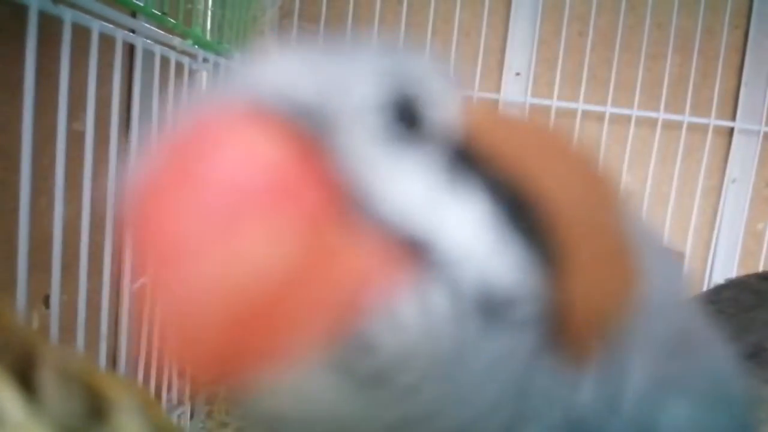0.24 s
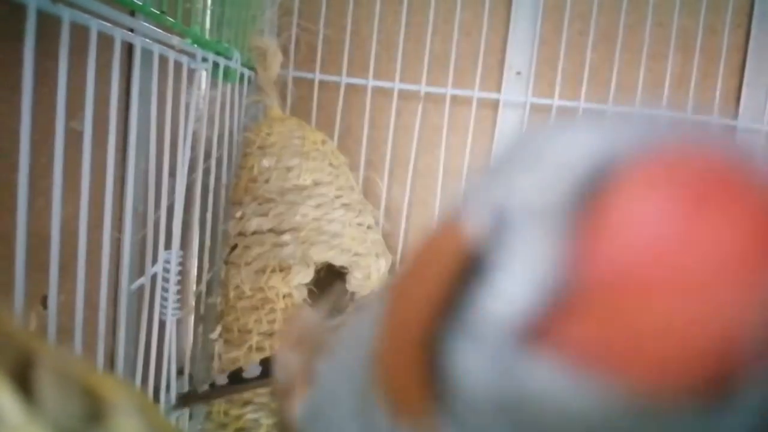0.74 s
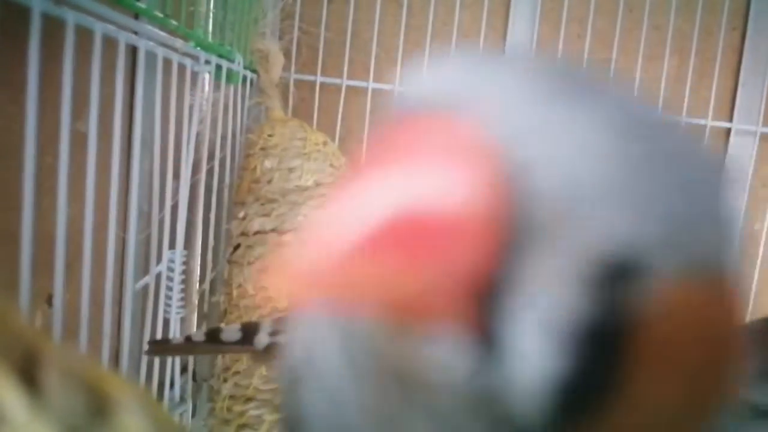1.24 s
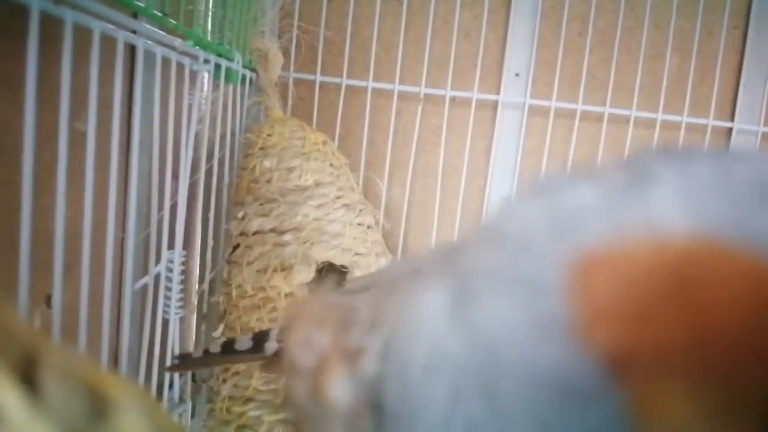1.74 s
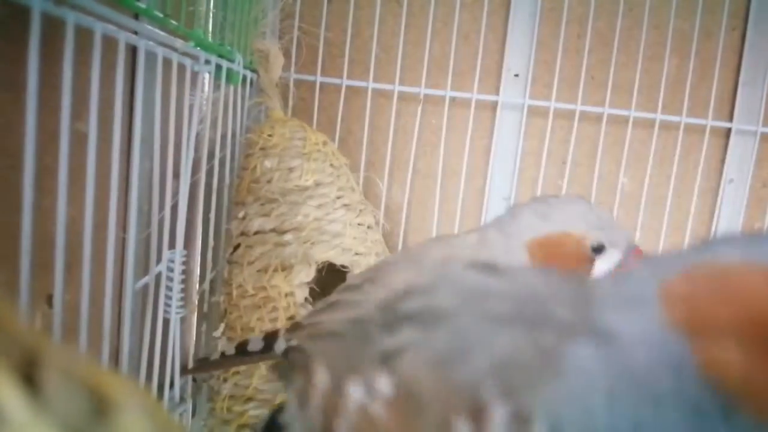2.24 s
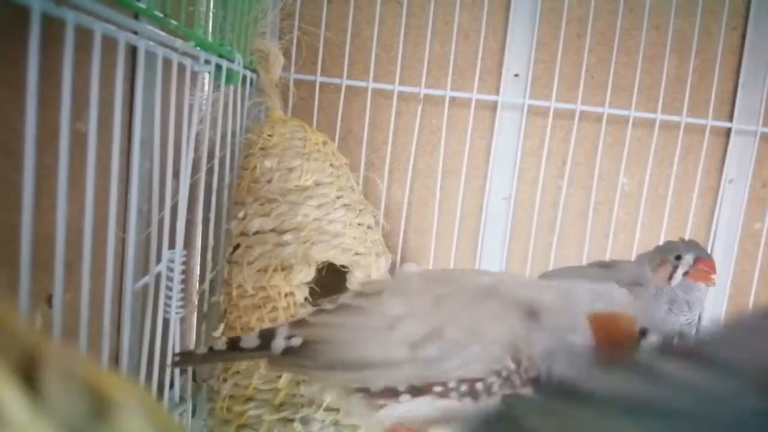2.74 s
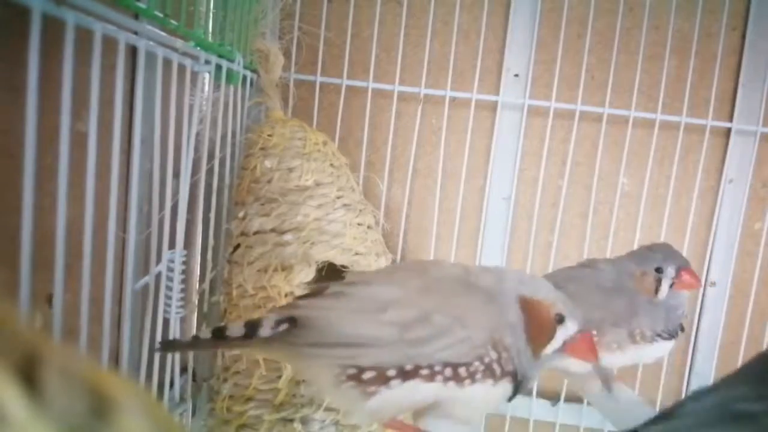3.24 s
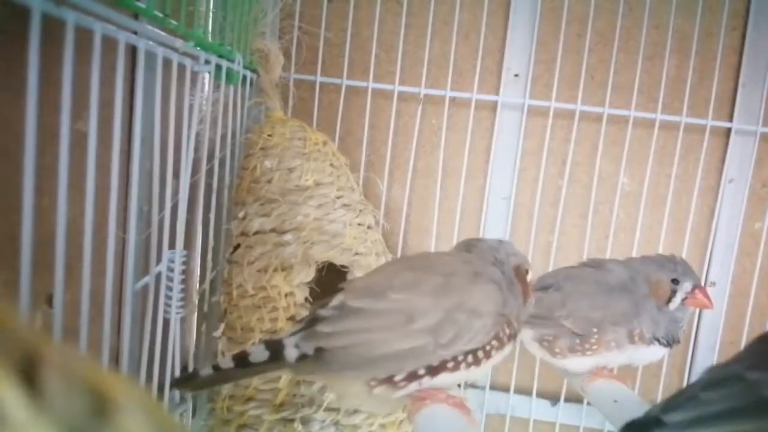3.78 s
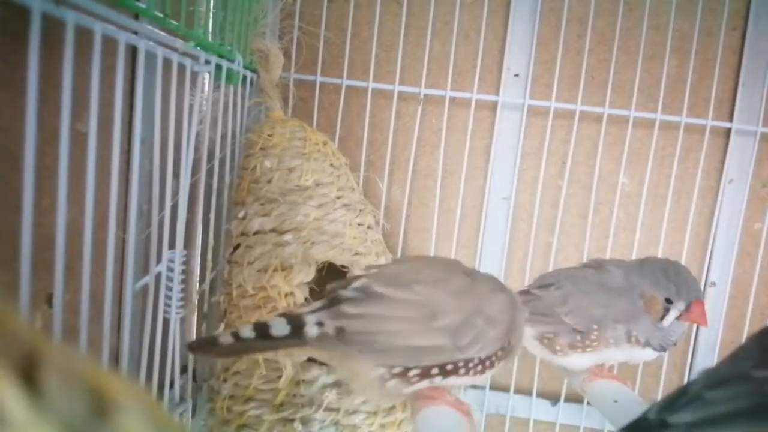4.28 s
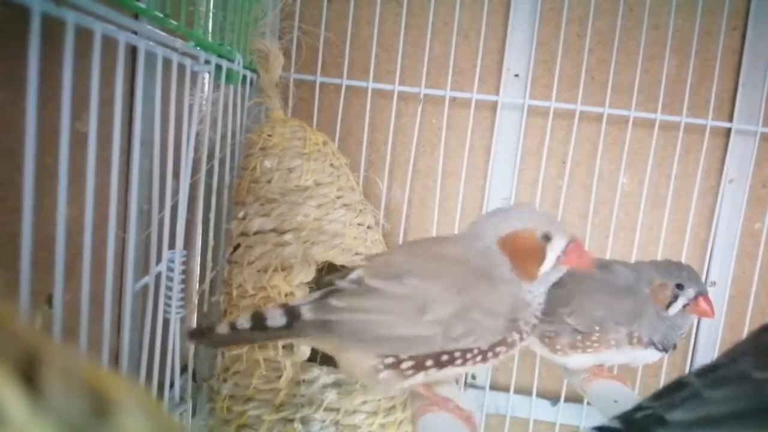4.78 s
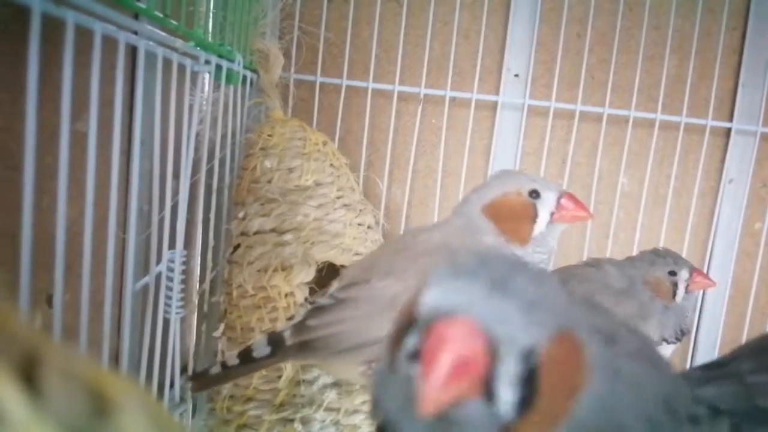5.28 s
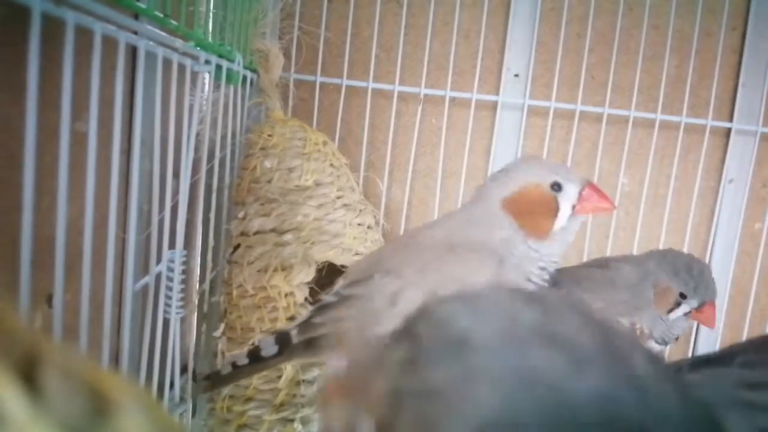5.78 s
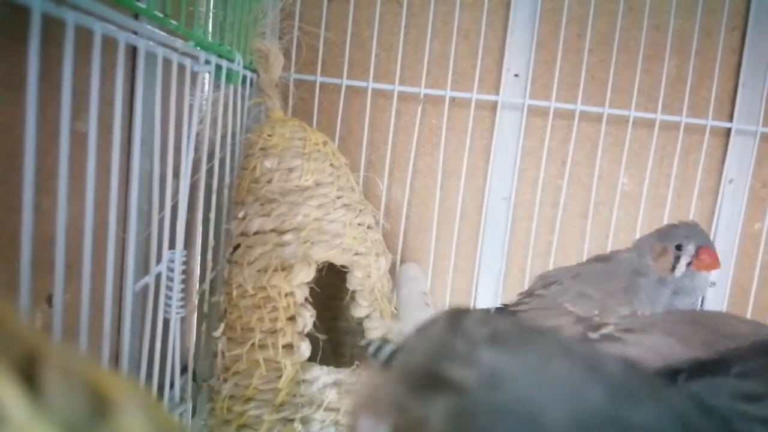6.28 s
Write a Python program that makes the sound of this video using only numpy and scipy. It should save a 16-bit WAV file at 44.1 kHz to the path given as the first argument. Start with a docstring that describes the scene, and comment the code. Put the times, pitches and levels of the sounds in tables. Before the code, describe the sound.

Several zebra finches chatter close by in a wire cage, with sharp chirps, raspy scolding, dry ticks and soft nasal calls over feather rustle.

```python
"""A high arched chirp over a soft rustle, then zebra finches chattering close by in a wire cage.
Whistles are quivering near sines; warbles add grit; rasps and dry tets are snaps ringing the throat;
nasal calls are harmonic stacks. Shaped noise rustles and taps, a foot scrapes, a perch thuds.
Dense echoes give the cage, a short noise tail the small room; faint far notes and a hush lie behind."""
import sys
import numpy as np
from scipy import signal
from scipy.fft import rfft, irfft
from scipy.io import wavfile
from scipy.ndimage import uniform_filter1d

SR = 44100
rng = np.random.default_rng(int(sys.argv[2]) if len(sys.argv) > 2 else 0)


def put_to_file(sound):
    """Save the sound as 16-bit audio at rate SR, in the file named by the first command-line argument."""
    columns = np.atleast_2d(sound).T  # one column per channel
    safe = np.clip(columns, -1, 1)
    whole_steps = np.round(safe * 32767)
    wavfile.write(sys.argv[1], SR, whole_steps.astype(np.int16))


N = 287532
TIME = np.arange(N) / SR   # s

# twitter motif, opening dip, high flick, low note:
# place in lead-up [0-1], length/s, start f/Hz, end f/Hz, grit re tone/dB, swell over note/dB
TWITTER_MOTIF = [(0, 0.02474, 3660, 2885, -25.5, 5.5), (.36, 0.023, 4596, 3676, -42, 11),
                 (.74, .021, 2750, 2950, -14, 8)]
# twitters: t/s, lead-up/s, slide top f/Hz, levels of dip, flick, low note, slide/dB
TWITTER_PHRASES = [(1.289, 0.0715, 3380, -31, -30, -25, -23.5), (3.023, 0.075, 3770, -25, -29, -24, -27.5),
                   (3.574, 0.073, 3714, -18.5, -26.5, -26, -24), (3.746, 0.071, 3798, -23, -26, -23, -23),
                   (5.286, 0.0709, 3747, -18, -24.5, -23.5, -24),
                   (5.463, .076, 3520, -20.5, -28, -23.5, -24.5), (5.728, 0.0687, 3534, -22, -32, -29, -27)]
# chirp motif, opening dip, held high note: columns as the twitter motif
CHIRP_MOTIF = [(0, 0.0262, 3690, 3060, -22.5, -2.5), (.34, 0.0262, 4296, 4208, -22, 11)]
# chirps: t/s, lead-up/s, slide top f/Hz, levels of dip, held note, slide/dB
CHIRP_PHRASES = [(0.733, 0.052, 4800, -26.5, -25, -32), (1.477, 0.049, 5250, -15, -15.5, -22),
                 (2.783, 0.06, 4720, -13.5, -16, -23.5), (4.021, 0.06, 3511, -20, -17.5, -23.5),
                 (4.185, 0.047, 4857, -18.5, -23.5, -27.5)]
# closing slide of each phrase
SLIDE_S, SLIDE_END_HZ, SLIDE_FADE_DB = 0.053, 2156, 7.5
# lone whistles, slurs and peeps: t/s, length/s, start f/Hz, end f/Hz, level/dB
LONE_SLURS = [(0.8, 0.037, 5046, 5022, -31), (0.841, 0.0142, 3840, 4013, -24.5),
              (1.094, 0.038, 3500, 3100, -31.5), (1.574, 0.021, 3710, 4150, -18.5),
              (1.879, 0.026, 3320, 2620, -38), (2.013, .032, 3308, 2760, -31),
              (2.467, 0.063, 4645, 4830, -37.5), (2.52, 0.0515, 3800, 2670, -30),
              (2.635, 0.0653, 3200, 2289, -30), (2.815, 0.025, 5213, 5340, -19),
              (2.899, 0.0125, 3950, 3738, -16), (2.914, 0.056, 6640, 4627, -23.5),
              (2.942, .037, 3074, 3059, -24.5), (3.1, 0.018, 3460, 3190, -27.5),
              (3.219, 0.0187, 5320, 2850, -26), (3.225, 0.02, 7220, 5816, -28.5),
              (3.275, .065, 4908, 2897, -27.5), (3.35, 0.053, 2985, 2140, -35.5),
              (4.482, 0.042, 4440, 4525, -27.5), (4.871, 0.055, 3050, 2520, -34.5),
              (5.616, 0.029, 4423, 3330, -29), (6.334, 0.011, 3330, 2710, -21.5),
              (6.362, 0.011, 2940, 3380, -22.5), (6.384, 0.012, 3165, 2970, -12.5),
              (6.504, 0.018, 4200, 2915, -20)]
# chirps that flick up and drop: t/s, length/s, top f/Hz, level/dB
ARCHED_CHIRPS = [(0.006, 0.052, 3837, -25.5), (2.972, 0.054, 3700, -26.5), (3.152, .042, 3911, -25.5),
                 (6.398, 0.043, 4160, -20.5)]
# pitch contour of an arched chirp: place in note [0-1], share of top f [ratio]
ARCH_CONTOUR = [(0, .85), (.22, 1), (.55, .8), (1, 0.5)]
# throat resonance that a whistle sweeps through: centre, half width, peak
THROAT_HZ, THROAT_WIDTH_HZ, THROAT_DB = 3226, 310, 10.5
# whistle quiver: RMS share of pitch, bandwidth
QUIVER, QUIVER_HZ = 0.015, 90
# second strand: pitch ratio, sine amplitude
STRAND_RATIO, STRAND_DB = 1.35, -19
# warble bouts: t/s, length/s, nominal centre f/Hz, level before the per-note offset/dB, grit re tone/dB
WARBLE_BOUTS = [(0.389, 0.19, 2864, -33.5, -5), (1.136, 0.21, 3270, -32, -10),
                (1.773, 0.17, 2980, -30, -5.5), (1.975, 0.15, 2912, -27, -8),
                (2.538, 0.13, 3050, -23.5, -3.5), (2.699, 0.095, 2875, -28.5, 5),
                (3.239, 0.042, 3350, -23.5, -8), (3.327, 0.056, 2910, -42, 1), (3.925, 0.1, 2970, -32, -7),
                (4.758, 0.11, 2950, -38.5, -4), (5.562, 0.13, 3229, -25, -2.5),
                (6.354, .095, 2950, -30.5, 4), (3.079, .058, 3050, -26.5, -17)]
# scolding rasps: t/s, length/s, squeal and throat start f/Hz, end f/Hz, level/dB
RASP_CALLS = [(0.142, 0.27, 5230, 5638, -45), (0.666, 0.054, 5020, 5770, -24.5),
              (0.709, 0.12, 6070, 5880, -33), (1.016, 0.081, 3367, 3100, -33),
              (2.812, 0.0713, 4600, 6280, -20.5), (4.257, 0.0758, 5424, 6080, -25.5),
              (4.38, 0.1098, 5860, 5613, -26.5), (4.511, 0.091, 5000, 5990, -24),
              (4.617, 0.06, 5420, 6310, -26), (4.668, 0.0904, 5610, 4990, -26),
              (5.548, 0.11, 5374, 4872, -33.5), (6.35, 0.128, 5503, 4900, -41.5)]
# spill of snaps through the beak: f/Hz, relative level/dB
BEAK_COLOUR = [(900, -15), (2800, -3), (6300, -10), (7700, -40), (10000, -58), (15000, -48.5)]
# short dry notes: t/s, level/dB
TET_NOTES = [(1.441, -30), (1.618, -38), (1.669, -33.5), (1.728, -29.5), (1.784, -31), (1.852, -29),
             (1.918, -28), (1.969, -34), (5.097, -35)]
# nasal calls: t/s, length/s, top f/Hz, place of top [0-1], level/dB
NASAL_CALLS = [(0.497, 0.0682, 635, 0.32, -38), (1.239, 0.1, 559, 0.47, -40),
               (2.197, 0.11, 628.6, 0.5, -32), (2.387, 0.082, 562.5, 0.29, -42.5),
               (5.883, 0.11, 680, .65, -33.5), (6.029, 0.11, 509.8, 0.28, -41)]
# spectrum of a nasal call: f/Hz, relative level/dB
NASAL_SPECTRUM = [(600, -17), (1200, -7), (2000, -12.5), (3600, -1), (5400, -2.5), (7500, -27),
                  (12000, -28.5)]
# a bird shifts about: t/s, length/s, level before lumpiness/dB
SHUFFLE_BOUTS = [(0, 0.16, -46.5), (0.427, 0.073, -47), (0.954, 0.51, -57.5), (2.372, 0.2, -44.5),
                 (2.56, 0.19, -48), (3.731, 0.165, -48.5), (4.999, 0.066, -50), (6.118, 0.036, -45.5)]
# swell, dying away, and the floor of the rustle before lumpiness
SHUFFLE_RISE_DB_PER_S, SHUFFLE_FALL_DB_PER_S, FIDGET_DB = 153, 52.5, -61.5
# spectrum of the rustle: f/Hz, relative level/dB
RUSTLE_SPECTRUM = [(40, -10), (85, 2.5), (380, -3.5), (700, -11.5), (1600, -16), (9000, -25.5),
                   (15000, -71)]
# claws on the cage: t/s, peak level/dB
CLAW_TAPS = [(0.43, -40.5), (6.194, -24), (6.202, -19.5)]
# bumps on a perch: t/s, gain on the perch modes/dB
PERCH_BUMPS = [(3.891, -38), (4.974, -35)]
# low ringing of the perch: f/Hz, relative level/dB, decay to 1/e/s
PERCH_RING = [(81.1, -8.5, 0.11), (161.7, -2.5, 0.0615)]
# cage echoes re direct sound
WHISTLE_ECHO_DB, WARBLE_ECHO_DB, RASP_ECHO_DB = -5.5, -1, 1
# room tail: decay by 60 dB, level re direct sound
ROOM_T60_S, ROOM_DB = 0.295, -10.5
FAR_CALLS_PER_S, FAR_DB, FAR_LOW_HZ, FAR_HIGH_HZ = 16, -59, 4600, 6200
HUSH_DB = -58.5
# spectrum of the hush: f/Hz, relative level/dB
HUSH_SPECTRUM = [(150, -13), (1100, -28), (2000, -21.5), (3200, -13), (5500, -16.5), (8000, -27),
                 (15000, -32)]
# colour of the two microphone ports: f/Hz, left minus right/dB
PORT_COLOUR = [(100, -4.5), (400, -8.5), (2000, -1.5), (3500, -6.5), (5500, 11.5), (8500, -15.5),
               (13000, 0.5)]
LIMIT_DB, RECOVERY_DB_PER_S, CUTOFF_HZ = -13.5, 23.5, 15200


def phrases(motif, sung):
    """Each phrase paces its motif over a lead-up, then ends in a fading downward slide."""
    out = np.zeros((2, N))
    for start_s, lead_s, top_hz, *note_dbs, slide_db in sung:
        for (place, length_s, from_hz, to_hz, grit_db, swell_db), db in zip(motif, note_dbs):
            note = whistle(length_s, lambda u: slur(u, from_hz, to_hz), db, grit_db, swell_db)
            add(out, start_s + place * lead_s, note)
        slide = whistle(SLIDE_S, lambda u: slur(u, top_hz, SLIDE_END_HZ), slide_db,
                        swell_db=-SLIDE_FADE_DB, edge_s=0.0038)
        add(out, start_s + lead_s, slide)
    return out


def lone_notes():
    """Single slurs and arched chirps: whistles on a gliding or arching pitch."""
    out = np.zeros((2, N))
    places, shares = np.transpose(ARCH_CONTOUR)
    for start_s, length_s, from_hz, to_hz, db in LONE_SLURS:
        add(out, start_s, whistle(length_s, lambda u: slur(u, from_hz, to_hz), db))
    for start_s, length_s, top_hz, db in ARCHED_CHIRPS:
        add(out, start_s, whistle(length_s, lambda u: top_hz * np.interp(u, places, shares), db))
    return out


def whistle(length_s, contour, db, grit_db=-18, swell_db=0, edge_s=0.00342):
    """A quivering note flares at the throat resonance; the syrinx's other side adds a strand above."""
    u, envelope = syllable(length_s, edge_s)
    hz = contour(u) * (1 + QUIVER * wander(len(u), QUIVER_HZ))
    throat_db = THROAT_DB / (1 + ((hz - THROAT_HZ) / THROAT_WIDTH_HZ) ** 2)
    tone = syrinx(hz, jitter=0.01515, shimmer_db=2.5, overtone_db=-25.0, fall_db=-14.5)
    strand_ratio = STRAND_RATIO + 2 * QUIVER * wander(len(u), QUIVER_HZ)
    strand = np.sin(phase_of(hz * strand_ratio))
    grit = buzz(hz, pulse_hz=667.0, uneven=0.14, ring_s=0.000064, spread_db=8.5)
    voice = tone + from_db(STRAND_DB) * strand + from_db(grit_db) * grit
    loudness = rms_one(envelope * from_db(throat_db + swell_db * u))
    return in_cage(from_db(db) * loudness * voice, echo_db=WHISTLE_ECHO_DB, echo_s=0.006, pan_db=3.0)


def warbles(note_s=0.045, step_s=0.03, fall=0.1613):
    """Hoarse falling notes from further back, near sine plus grit, tumble over each other."""
    out = np.zeros((2, N))
    for start_s, length_s, centre_hz, db, grit_db in WARBLE_BOUTS:
        count = max(1, round((length_s - note_s) / step_s) + 1)
        for note_at_s in start_s + np.linspace(0, max(0, length_s - note_s), count):
            u, envelope = syllable(min(length_s, note_s), edge_s=0.007)
            hz = centre_hz * np.exp(0.057 * rng.normal() + fall * (1 - 2 * u))
            tone = syrinx(hz, jitter=0.035, shimmer_db=4, overtone_db=-27, fall_db=-16, shake_hz=300)
            grit = buzz(hz, pulse_hz=569.6, uneven=0.11, ring_s=0.00052, spread_db=4.5)
            voice = rms_one(tone + from_db(grit_db) * grit)
            note_db = db - 2.0 + 1.0 * rng.normal()
            note = from_db(note_db) * envelope * voice
            add(out, note_at_s, in_cage(note, echo_db=WARBLE_ECHO_DB, echo_s=0.0076, pan_db=3.0))
    return out


def rasps(flutter_hz=130, flutter=0.057):
    """Harsh scolding: a fluttering squeal, a growl at 0.59 of its pitch and a rattle of snaps."""
    out = np.zeros((2, N))
    for start_s, length_s, from_hz, to_hz, db in RASP_CALLS:
        u, envelope = syllable(length_s, edge_s=0.016)
        envelope = envelope * from_db(0.83 * wander(len(u), 139))
        swing = np.sin(phase_of(flutter_hz * np.exp(0.37 * wander(len(u), 85.3))))
        hz = slur(u, from_hz, to_hz) * (1 + flutter * swing)
        squeal = syrinx(hz, jitter=0.0458, shimmer_db=5.5, overtone_db=-34.0, shake_hz=770)
        growl = syrinx(hz * 0.59, jitter=0.0733, shimmer_db=8.0, overtone_db=-15.5,
                       fall_db=-3.0, shake_hz=589)
        rattle = buzz(hz, pulse_hz=520.5, uneven=0.2, ring_s=0.00037, spread_db=-10.5)
        voice = rms_one(squeal + from_db(-11.0) * growl + from_db(-2.5) * rattle)
        add(out, start_s, in_cage(from_db(db) * envelope * voice, echo_db=RASP_ECHO_DB))
    return out


def tets():
    """Dry notes: a few snaps each, the throat sweeping upward."""
    out = np.zeros((2, N))
    for start_s, db in TET_NOTES:
        u, envelope = syllable(0.017, edge_s=0.00422)
        throat_hz = slur(u, 5480, 5700)
        voice = buzz(throat_hz, pulse_hz=792, uneven=0.13, ring_s=0.00042, spread_db=-2.0)
        add(out, start_s, in_cage(from_db(db) * envelope * voice))
    return out


def nasals():
    """A stack of 20 coloured harmonics on an arching pitch."""
    out = np.zeros((2, N))
    for start_s, length_s, top_hz, crest, db in NASAL_CALLS:
        u, envelope = syllable(length_s, edge_s=0.014)
        arch = 1 - 1.1 * (u - crest) ** 2
        phase = phase_of(top_hz * arch * (1 + 0.013 * wander(len(u), 210)))
        stack = coloured(sum(np.cos(k * phase) for k in range(1, 21)), NASAL_SPECTRUM)
        swell = from_db(3.24 * u + 1.8 * wander(len(u), 160))
        call = from_db(db) * rms_one(envelope * arch ** 2 * stack * swell)
        add(out, start_s, in_cage(call, echo_db=-1, echo_s=0.008))
    return out


def syrinx(hz, jitter, shimmer_db, overtone_db, fall_db=-11, shake_hz=260):
    """A near sine with weak, flickering overtones; unsteady membranes shake pitch and strength."""
    size = len(hz)
    phase = phase_of(hz * (1 + jitter * wander(size, shake_hz)))
    tone = np.sin(phase)
    for k in range(2, 5):
        flicker_db = 4 * wander(size, shake_hz)
        # overtone_db holds midway between harmonics 2 and 3
        gain = from_db(overtone_db + fall_db * (k - 2.5) + flicker_db)
        tone += gain * np.sin(k * phase) * (k * hz < SR / 2)
    return rms_one(tone * from_db(shimmer_db * wander(size, shake_hz)))


def buzz(throat_hz, pulse_hz, uneven, ring_s, spread_db):
    """Snaps of the syrinx ring the throat and spill through the beak's broad resonances."""
    snaps = snapping(len(throat_hz), pulse_hz, uneven)
    spill = rms_one(coloured(snaps, BEAK_COLOUR))
    voice = ring(snaps, throat_hz, ring_s) + from_db(spread_db) * spill
    return rms_one(signal.sosfilt(signal.butter(2, 1700, "high", fs=SR, output="sos"), voice))


def snapping(size, pulse_hz, uneven):
    """A train of snaps whose rate wavers and whose strength varies."""
    rate_hz = pulse_hz * np.exp(uneven * wander(size, pulse_hz / 2))
    cycles = np.floor(np.cumsum(rate_hz) / SR)
    return np.diff(cycles, prepend=-1) * np.exp(2 * uneven * rng.standard_normal(size))


def ring(snaps, hz, ring_s):
    """Snaps ring a moving one-pole resonance."""
    turn = np.exp(1j * phase_of(hz))
    decayed = signal.lfilter([1], [1, -np.exp(-1 / (ring_s * SR))], snaps / turn)
    return rms_one(np.gradient((turn * decayed).imag))


def movements():
    """Feathers and feet rub as lumpy coloured noise; claws tap as sharp noise bursts."""
    rubbing = rms_one(coloured(rng.standard_normal(N), RUSTLE_SPECTRUM))
    out = stirring() * from_db(2.4 * wander(N, 52.6)) * rubbing
    t = TIME[:SR // 20]
    for start_s, db in CLAW_TAPS:
        burst = rng.standard_normal(len(t)) * np.exp(-t / 0.00097)
        tap = signal.lfilter([1], [1, -0.8], burst)
        add(out, start_s, from_db(db) * tap / np.abs(tap).max())
    return out


def stirring():
    """Rustle strength: each shuffle swells, holds and dies away over a constant floor."""
    gains = []
    for start_s, length_s, db in SHUFFLE_BOUTS:
        rise_db = SHUFFLE_RISE_DB_PER_S * np.maximum(start_s - TIME, 0)
        fall_db = SHUFFLE_FALL_DB_PER_S * np.maximum(TIME - start_s - length_s, 0)
        gains.append(from_db(db - rise_db - fall_db))
    return np.maximum(np.max(gains, axis=0), from_db(FIDGET_DB))


def scrape(start_s=0.428, length_s=0.28, db=-36.5):
    """A foot slips along a perch: uneven catches ring a sinking low note and die away."""
    out = np.zeros((2, N))
    u, envelope = syllable(length_s, edge_s=0.0053)
    catches = snapping(len(u), pulse_hz=298, uneven=0.3)
    body = ring(catches, slur(u, 450, 350), ring_s=0.0027)
    band = signal.butter(2, [600, 2200], "band", fs=SR, output="sos")
    scratch = rms_one(signal.sosfilt(band, catches))
    slip = from_db(db - 10 * u) * envelope * (body + from_db(1.5 - 10 * u) * scratch)
    add(out, start_s, in_cage(slip, echo_db=3.0, echo_s=0.008))
    return out


def bumps():
    """A bird's weight sets its perch thudding: decaying low sines with a soft onset."""
    out, t = np.zeros(N), TIME[:SR // 2]
    modes = sum(from_db(db) * np.sin(2 * np.pi * hz * t) * np.exp(-t / decay_s)
                for hz, db, decay_s in PERCH_RING)
    thud = modes * (1 - np.exp(-t / 0.0055))
    for start_s, db in PERCH_BUMPS:
        add(out, start_s, from_db(db) * thud)
    return out


def in_cage(voice, echo_db=-6, echo_s=0.004, pan_db=0):
    """Left port hears a bird first; each turn of its head gives other echoes off bars and walls."""
    t = TIME[:int(5 * echo_s * SR)]
    paths = rng.standard_normal((2, len(t))) * np.exp(-t / echo_s)
    paths *= from_db(echo_db) / np.linalg.norm(paths[0])
    paths[0, 0] = paths[1, int(0.00042 * SR)] = 1   # direct sound, right port 0.42 ms late
    paths /= np.linalg.norm(paths[0])
    return signal.fftconvolve(voice[None], paths) * from_db([[pan_db / 2], [-pan_db / 2]])


def room(x):
    """The room's short tail: exponentially decaying noise."""
    t = TIME[:SR // 2]
    tail = rng.standard_normal(len(t)) * from_db(-60 * t / ROOM_T60_S)
    return signal.fftconvolve(x, from_db(ROOM_DB) * tail / np.linalg.norm(tail))[:N]


def far_birds(length_s=0.051):
    """Faint level-pitched notes at random moments, heard only as the room's echo."""
    out = np.zeros(N)
    u, envelope = syllable(length_s, edge_s=0.063)
    for when, pitch, weakness in rng.random((int(FAR_CALLS_PER_S * N / SR), 3)):
        hz = FAR_LOW_HZ * (FAR_HIGH_HZ / FAR_LOW_HZ) ** pitch
        note = np.sin(phase_of(np.full(len(u), hz)))
        add(out, when * N / SR, from_db(-8 * weakness) * envelope * note)
    return from_db(FAR_DB) * rms_one(np.array([room(out), room(out)]))


def room_hush():
    """Steady coloured noise, partly shared by the two ports."""
    noise = rng.standard_normal((2, N)) + rng.standard_normal(N)
    return from_db(HUSH_DB) * rms_one(coloured(noise, HUSH_SPECTRUM))


def gain_control(x):
    """Power over the limit pushes the gain down at once; it creeps back in the lulls."""
    power = uniform_filter1d(np.max(x ** 2, axis=0), size=180)
    over_db = np.maximum(10 * np.log10(np.abs(power) + 1e-12) - LIMIT_DB, 0)
    recovery_db = RECOVERY_DB_PER_S * TIME
    held_db = np.maximum.accumulate(over_db + recovery_db) - recovery_db
    return x * from_db(-uniform_filter1d(held_db, size=90))


def from_db(db):
    """Decibels to gain."""
    return 10 ** (np.asarray(db) / 20)


def rms_one(x):
    """Scale to unit power."""
    return x / np.sqrt(np.mean(x ** 2) + 1e-20)


def add(out, start_s, sound):
    """Mix a sound in at its time."""
    at = max(0, int(start_s * SR))
    out[..., at:at + sound.shape[-1]] += sound[..., :max(0, N - at)]


def coloured(x, points):
    """Filter by a (f/Hz, level/dB) curve, interpolated over log frequency."""
    hz, db = np.transpose(points)
    bins_hz = np.fft.rfftfreq(x.shape[-1], 1 / SR)
    gain = from_db(np.interp(np.log(bins_hz + 1), np.log(hz), db))
    return irfft(rfft(x) * gain, x.shape[-1])


def wander(size, rate_hz):
    """Low-passed noise of unit spread."""
    lowpass = signal.butter(4, rate_hz, fs=SR, output="sos")
    slow = signal.sosfilt(lowpass, rng.standard_normal(size + SR // 10))
    return rms_one(slow)[-size:]   # drops the filter's start-up


def syllable(length_s, edge_s):
    """Progress 0-1 through a note, and its unit-power envelope with soft edges."""
    u = np.linspace(0, 1, int(length_s * SR))
    edge = np.clip(np.minimum(u, 1 - u) * length_s / edge_s, 0, 1)
    return u, rms_one(np.sin(edge * np.pi / 2) ** 2)


def slur(u, start_hz, end_hz):
    """Nearly straight pitch glide, slightly quicker at first."""
    return end_hz + (start_hz - end_hz) * (1 - u) ** 1.1


def phase_of(hz):
    """Running phase of a moving frequency."""
    return 2 * np.pi * np.cumsum(hz) / SR


def scene():
    """Voices and movements in the cage, their room tail, far birds and hush."""
    whistles = phrases(TWITTER_MOTIF, TWITTER_PHRASES) + phrases(CHIRP_MOTIF, CHIRP_PHRASES) + lone_notes()
    voices = whistles + warbles() + rasps() + tets() + nasals()
    birds = voices + movements() + scrape() + bumps()
    tails = np.array([room(port) for port in birds])
    return birds + tails + far_birds() + room_hush()


def record(dry):
    """Each port has its own colour; the gain is held in check and the top is cut."""
    left_curve = [(hz, db / 2) for hz, db in PORT_COLOUR]
    right_curve = [(hz, -db / 2) for hz, db in PORT_COLOUR]
    ports = np.array([coloured(dry[0], left_curve), coloured(dry[1], right_curve)])
    top_cut = signal.ellip(10, 0.1, 90, CUTOFF_HZ, fs=SR, output="sos")
    return signal.sosfilt(top_cut, gain_control(ports))


dry = scene()
out = record(dry)
put_to_file(out)
```